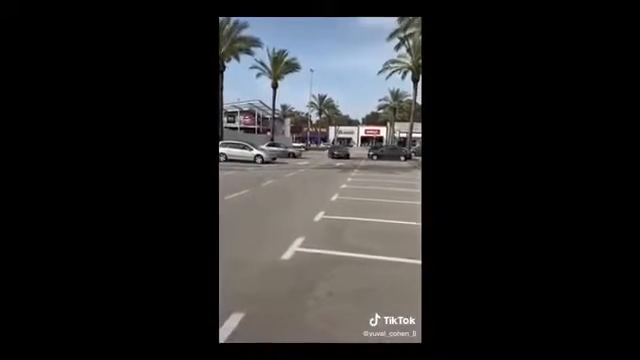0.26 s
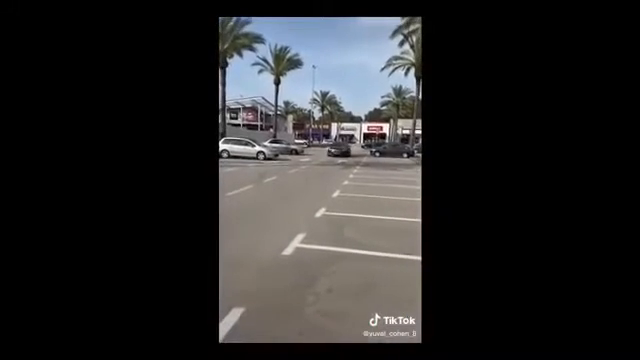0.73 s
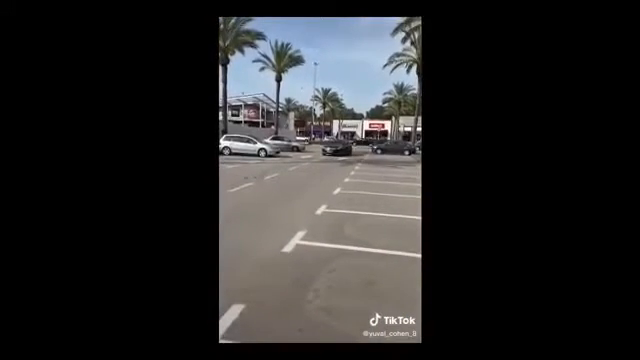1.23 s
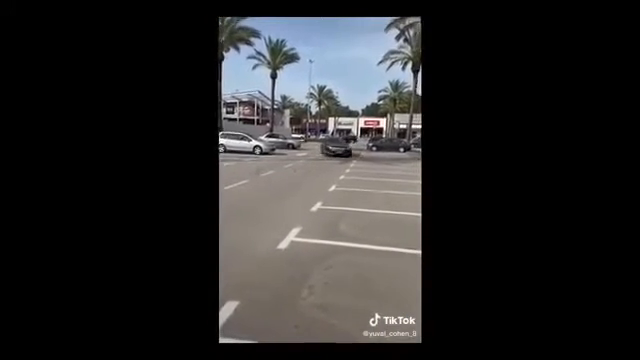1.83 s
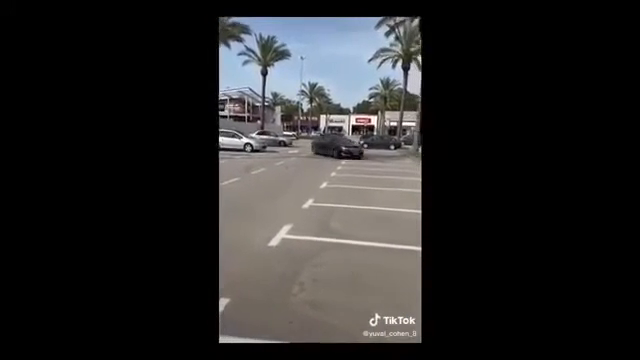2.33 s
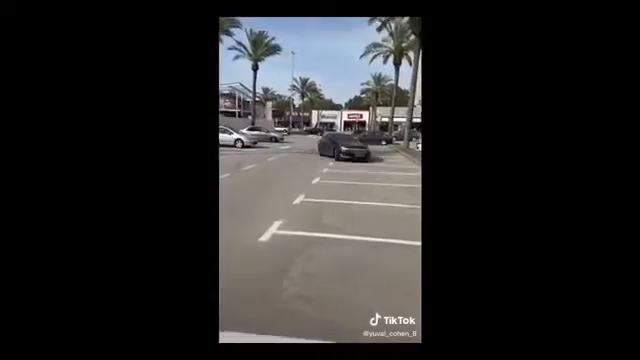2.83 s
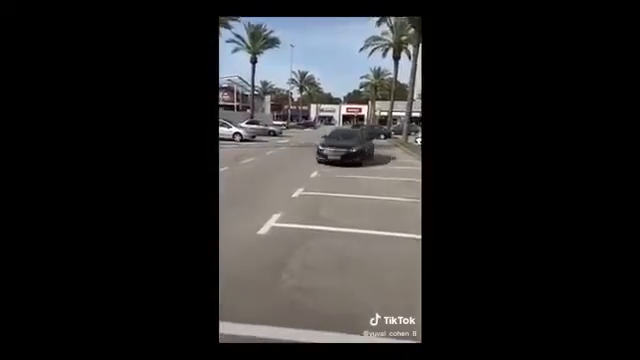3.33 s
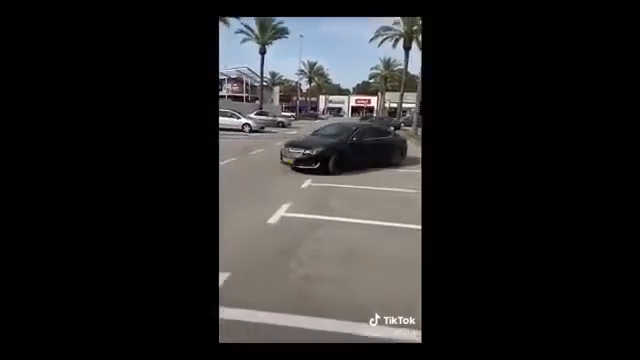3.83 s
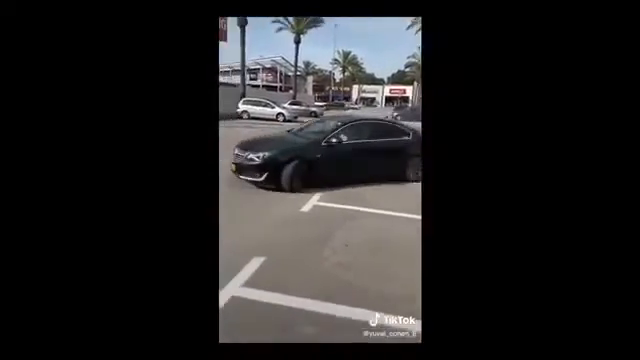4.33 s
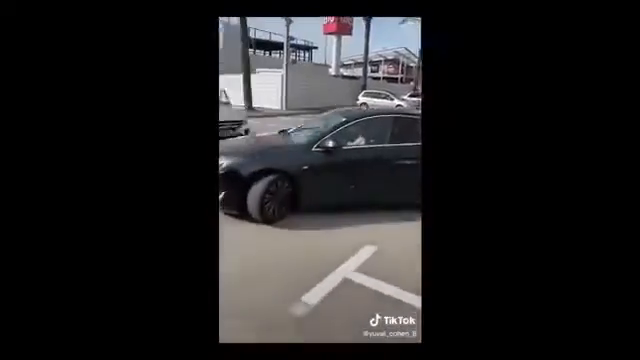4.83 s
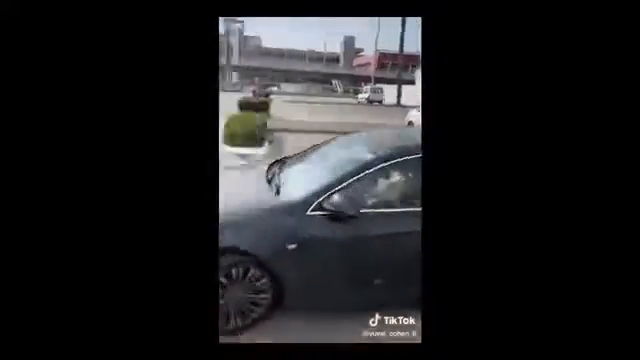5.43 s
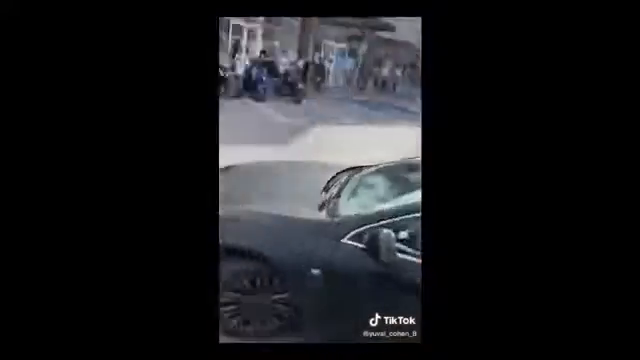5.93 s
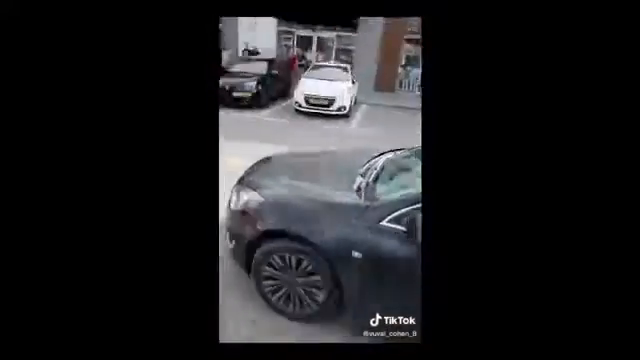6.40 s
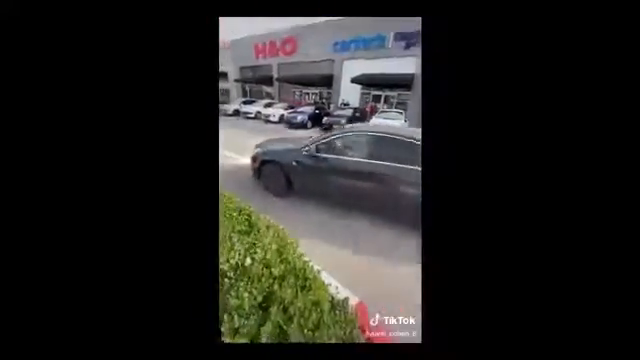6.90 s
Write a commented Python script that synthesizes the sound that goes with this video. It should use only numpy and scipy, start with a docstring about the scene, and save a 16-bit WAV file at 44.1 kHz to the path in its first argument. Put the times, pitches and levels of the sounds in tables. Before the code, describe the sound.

Car tyres give a long, wavering squeal while sliding across asphalt, over gritty hiss, low rumble and wind gusts on the microphone.

```python
"""A car skids past

A car slides sideways across an open asphalt lot, past a hand-held phone. One tyre sticks
and slips so fast that it squeals, while the others howl more loosely around it. Rubber
hisses over grit, the engine drones faintly above a low rumble, and gusts hit the microphones."""
import sys
import numpy as np
from scipy import signal
from scipy.fft import next_fast_len
from scipy.io import wavfile
from scipy.ndimage import uniform_filter1d

SR = 44100
rng = np.random.default_rng(int(sys.argv[2]) if len(sys.argv) > 2 else 0)


def file_out(sig):
    """Save sig as 16-bit WAV at sys.argv[1]."""
    # one column per channel
    cols = np.atleast_2d(sig).T
    # limit, then scale
    lim = np.clip(cols, -1, 1)
    pcm = np.round(lim * 32767).astype(np.int16)
    wavfile.write(sys.argv[1], SR, pcm)


N = 315756

# Where the car is heard; it seems wider when it is near:
# (time [s], left minus right [dB], left's head start [radians], width [0-1])
CAR_POSITION = [(0, -3, -0.68, 0), (.7, -2.5, -0.65, 0.3), (1.15, -4.5, -0.56, 0.25),
                (1.6, -3, -0.87, 0.05), (2.3, -0.5, -0.53, 0.1), (3, -3.5, -0.58, 0.23),
                (3.5, -1.3, -0.48, 0.25), (4.5, -1, -0.38, 0.39), (5, -3.5, -0.75, 0.36),
                (5.6, -2, -0.45, 0.72), (6.2, -1, -1.02, 0.38), (6.8, -6.5, -1.36, 0.98),
                (7.16, -5.5, -1.1, 0.85)]


def amp(db):
    """Turn decibels into a gain."""
    return 10 ** (np.asarray(db) / 20)


def unit_power(x):
    """Scale a signal to an average power of 1."""
    return x / np.sqrt(np.mean(abs(x) ** 2) + 1e-20)


def curves(rows, t):
    """Read a table's columns at times t, gliding from row to row."""
    times, *columns = np.transpose(rows)
    return [np.interp(t, times, column) for column in columns]


def at_pitch(points, hz):
    """Read a (frequency, value) table, gliding on a log-frequency scale."""
    freqs, values = np.transpose(points)
    return np.interp(np.log(hz + 1), np.log(freqs + 1), values)


def wander(width_hz, low_hz):
    """A random complex wobble, mostly slower than width_hz and thinned out below low_hz."""
    step = 16  # samples between drawn points
    hz = abs(np.fft.fftfreq(next_fast_len(N // step + 2), step / SR))
    real, imag = rng.standard_normal((2, len(hz)))
    shape = (hz / (hz + low_hz)) / (1 + (hz / width_hz) ** 2)
    coarse = np.fft.ifft((real + 1j * imag) * shape)
    return unit_power(np.interp(np.arange(N) / step, np.arange(len(hz)), coarse))


def tremble(depth, width_hz, low_hz):
    """A gain that is steady at depth 0 and all wobble at depth 1."""
    return np.sqrt(1 - depth ** 2) + depth * wander(width_hz, low_hz)


def oscillator(hz):
    """A complex tone that follows a changing pitch."""
    return np.exp(2j * np.pi * np.cumsum(hz) / SR)


def stereo(tone, pan_db, lead):
    """Send a complex tone to two microphones, the left pan_db louder and lead radians ahead."""
    half = amp(pan_db / 2) * np.exp(.5j * lead)
    return np.sqrt(2) * np.array([tone * half, tone / half]).real


def shaped_noise(level_db, likeness, size, patchy_db, flicker_db):
    """Patchy, flickering noise that follows level_db(hz, t); likeness(hz) ties left to right."""
    hop = size // 4
    hz = np.fft.rfftfreq(size, 1 / SR)[:, None]
    t = np.arange(N // hop + 5) * hop / SR
    real, imag, other_real, other_imag, patches = rng.standard_normal((len(t), len(hz), 5)).T
    patches = unit_power(uniform_filter1d(uniform_filter1d(patches, 10, axis=0), 8, axis=1))
    same = np.clip(likeness(hz), 0, 1)
    left = real + 1j * imag
    right = same * left + np.sqrt(1 - same ** 2) * (other_real + 1j * other_imag)
    gain = amp(level_db(hz, t) + patchy_db * patches + flicker_db * rng.standard_normal(len(t)))
    _, noise = signal.istft(np.array([left, right]) * gain, nperseg=size, noverlap=size - hop)
    return noise[:, :N] / np.sqrt(size)


def rumble():
    """Rolling tyres, exhaust and far traffic blend into a low wash that swells as the car passes."""
    # Tone colour of the wash: (frequency [Hz], level [dB])
    colour = [(40, -26.5), (120, -25.5), (300, -32), (500, -34), (700, -28.5), (1000, -51.5), (1600, -110)]
    # Its rise and fall: (time [s], gain [dB])
    swell = [(0, 16), (.8, 4), (2.9, 9), (3.6, -3), (4.5, -3.5), (5.3, 2.5), (6.3, 13), (6.7, 5), (7, -2),
             (7.16, -32)]

    def level_db(hz, t):
        return at_pitch(colour, hz) + curves(swell, t)[0]
    return shaped_noise(level_db, lambda hz: .6, size=1024, patchy_db=3.5, flicker_db=1.5)


def wind():
    """Gusts buffet the microphones with low, lumpy noise, a little different in each."""
    # Gusts of air: (start [s], end [s], gain [dB], extra deep bass [dB])
    gusts = [(0, .17, 11, 6.5), (0.195, 0.263, 14.5, 5.5), (0.368, 0.539, 11, 6), (0.972, 1.18, 8.5, -4.5),
             (1.247, 1.42, 6.5, 0.5), (1.483, 1.653, 6.5, -1.5), (1.752, 1.8, 2.5, 6),
             (2.042, 2.337, 7, -2), (2.82, 2.974, 7, -2), (3.14, 3.293, 5.5, 0), (3.321, 3.599, -0.5, 5),
             (3.732, 4.272, 2, -6.5), (4.442, 4.724, -7, 8.5), (4.812, 4.847, -3, 10), (5.003, 5.14, 2, 0),
             (6.379, 6.561, 8.5, -10), (6.65, 6.926, -4.5, 7)]
    # Tone colour of the buffeting: (frequency [Hz], level [dB])
    colour = [(20, -16.5), (45, -25.5), (75, -14), (150, -18.5), (310, -21.5), (460, -23), (560, -39),
              (900, -42), (1500, -110)]
    rise_db_per_s, fall_db_per_s, bass_hz = 520, 420, 100

    def level_db(hz, t):
        power = 0
        for start, end, db, bass_db in gusts:
            fade_db = rise_db_per_s * np.maximum(start - t, 0) + fall_db_per_s * np.maximum(t - end, 0)
            power += amp(db + bass_db / (1 + (hz / bass_hz) ** 4) - fade_db) ** 2
        return at_pitch(colour, hz) + 10 * np.log10(power + 1e-6)
    return shaped_noise(level_db, lambda hz: .88 - .2 * np.minimum(hz / 300, 1),
                        size=512, patchy_db=2.5, flicker_db=2.5)


def puffs(t):
    """Pockets of air hit both microphones: blunt pushes that ring for a cycle or two."""
    # Single hard puffs: (time [s], strength [dB], pitch [Hz])
    hits = [(.203, -14, 294), (0.236, -19, 203), (2.939, -24.5, 170.4), (3.094, -25, 173.6),
            (3.105, -26, 140.5)]
    decay_cycles, out = 1.1, 0
    for start, db, hz in hits:
        cycles = np.maximum(t - start, 0) * hz
        out += 2 * amp(db) * np.sin(2 * np.pi * cycles) * np.exp(-cycles / decay_cycles)
    return out


def engine(t):
    """The cylinders fire in quick turns, making a low, unsteady tone."""
    # The engine's drone: (time [s], firing rate [Hz], level [dB])
    drone = [(0, 161.7, -55), (.6, 159.1, -35), (1, 139.8, -57.5), (1.8, 139.6, -39), (2.5, 119.6, -59),
             (5.7, 109.7, -65), (6.15, 114, -41), (6.4, 108.8, -65), (7.16, 100.4, -58)]
    hz, db = curves(drone, t)
    tone = amp(db) * tremble(.8, width_hz=10, low_hz=.6) * oscillator(hz)
    return stereo(tone, pan_db=.1, lead=-.3)


def echoes(sound):
    """Buildings and parked cars send back scattered echoes that die within half a second."""
    t = np.arange(SR // 2) / SR
    taps = rng.choice([-1., 1.], (2, len(t))) * (rng.random((2, len(t))) < .03)
    taps *= amp(-60 * t / .5) * (t > .012)
    return signal.fftconvolve(sound.mean(0)[None], taps / np.linalg.norm(taps[0]), axes=1)[:, :N]


def scrub():
    """Rubber drags over rough asphalt and makes a wide hiss of changing brightness."""
    # Course of the hiss: (time [s], gain [dB], treble tilt [dB per octave])
    drag = [(0, -3.5, -0.5), (.4, 0, 0.5), (.88, -7.5, 0.5), (1.11, -1.5, 2), (1.6, -13.5, -3),
            (2.03, -3, 0), (2.5, -10, 1), (2.91, -7, -1.5), (3.1, -5, 0.5), (3.55, -3, 1.5),
            (3.67, -11, -2), (3.85, -9, 4), (4.27, -11.5, 6.5), (4.85, -8.5, 5), (5.3, -4.5, 6),
            (5.66, -7, 2.5), (6.45, -2.5, -4), (6.84, -7.5, 1), (7.16, -11.5, 5)]
    # Tone colour of rubber on grit: (frequency [Hz], level [dB])
    colour = [(300, -22.5), (700, -18.5), (1300, -11.5), (2200, -12.5), (2800, -9.5), (3200, -15.5),
              (4300, -19.5), (4850, -29), (5600, -24), (6500, -28.5), (8000, -37), (11000, -42.5),
              (14500, -51)]
    # How alike left and right sound: (frequency [Hz], likeness [0-1])
    likeness = [(300, 0.04), (1100, 0.57), (1450, 1), (2300, 1), (2900, 0.03), (4500, 0), (5500, 0.35),
                (9000, 0.61), (14000, 0.6)]
    dull_hz, dull_octaves, far_db, near_db = 2960, .45, -3.5, -8.5

    def level_db(hz, t):
        db, tilt = curves(drag, t)
        treble_db = tilt * np.clip(np.log2((hz + 50) / 5000), 0, 1.2)
        # one band dulls further when the car body is close
        dull_db = far_db + (near_db - far_db) * curves(CAR_POSITION, t)[2]
        band = np.exp(-.5 * (np.log2((hz + 50) / dull_hz) / dull_octaves) ** 2)
        return at_pitch(colour, hz) + db + treble_db + dull_db * band
    return shaped_noise(level_db, lambda hz: at_pitch(likeness, hz),
                        size=512, patchy_db=2.1, flicker_db=1.2)


def howl(t):
    """The other tyres never settle on one slip rate: breathy, roving whistles with weak octaves."""
    # Two tyres: (time [s], lower pitch [Hz], its level [dB], upper pitch [Hz], its level [dB])
    tyre_pair = [(0, 820, -25, 1049, -26), (.07, 829, -20.5, 1039, -18), (.2, 830, -32, 1020, -32.5),
                 (.55, 811, -34, 1027, -29.5), (.86, 846, -38, 1030, -48), (1.0, 896, -25, 1020, -28),
                 (1.14, 875, -25, 1094, -32), (1.5, 871, -39.5, 1048, -41), (1.95, 852, -39.5, 1039, -36),
                 (2.0, 856, -30.5, 1060, -26), (2.13, 836, -38, 1050, -23),
                 (2.2, 848.3, -21.5, 1041, -34.5), (2.45, 843, -45, 1031, -33.5),
                 (2.7, 846, -36.5, 1015, -41.5), (2.9, 817.5, -33, 1032, -33.5),
                 (3.3, 859.5, -39, 1031, -31.5), (3.53, 889, -28, 1026, -25),
                 (3.77, 859, -34.5, 963.6, -31.5), (4.13, 865, -40, 961.4, -36),
                 (4.4, 876, -26.5, 978, -36), (4.79, 849.5, -35.5, 1000, -31.5),
                 (5.34, 860.7, -34.5, 991, -22), (5.44, 861, -24, 1018, -23), (5.52, 858, -33, 1029, -17.5),
                 (5.62, 856.6, -35, 1038, -29.5), (5.95, 862.4, -23, 972, -29),
                 (6.3, 884.6, -26, 944.3, -27), (6.5, 888.5, -22, 980, -24), (6.66, 868, -23.5, 1028, -21),
                 (6.85, 843.3, -21.5, 1002, -28), (7.16, 864, -53, 965, -23.5)]
    # A faint, lower tyre whose pitch sags: (time [s], pitch [Hz], level [dB])
    moan = [(1.8, 760, -64), (2.0, 735, -43), (2.75, 650, -43), (3.0, 640, -50)]
    lower_hz, lower_db, upper_hz, upper_db = curves(tyre_pair, t)
    pan_db, lead, width = curves(CAR_POSITION, t)
    rasp_db = upper_db - 32 + 24 * np.minimum(width / .39, 1)  # heard only from close by
    voices = [(lower_hz, lower_db, 28, 24), (upper_hz, upper_db, 30, 38),
              (*curves(moan, t), 25, 15), (1.17 * upper_hz, rasp_db, 60, 70)]
    out = 0
    for hz, db, breath_hz, rove_hz in voices:
        wave = oscillator(hz + rove_hz * wander(width_hz=7.83, low_hz=.937).real)
        whistle = wander(breath_hz, low_hz=1) * wave
        # a near car fills a wide angle, so its sound shifts between the microphones
        shift = .92 * width * wander(width_hz=31, low_hz=.55)
        out += stereo(amp(db) * whistle, pan_db + 4 * shift.imag, lead + shift.real)
        out += stereo(amp(db - 23) * whistle ** 2, pan_db=.3, lead=.1)
    return out


def looseness(t, snagging):
    """How unsteady the loudest tyre's grip is: 1 when it falters, 0 when it holds, less at its best."""
    # Spells of faltering grip: (start [s], end [s])
    lapses = [(0, .6), (.76, 1.101), (1.6, 1.8), (2.65, 3.76), (4.8, 4.98), (5.25, 5.55), (5.8, 6.1),
              (6.7, 7.0)]
    fade_s = .1
    faltering = sum(np.clip(np.minimum(t - start, end - t) / fade_s + .5, 0, 1) for start, end in lapses)
    firmest = (t > 4.42) & (t < 4.78)
    return np.minimum(faltering + snagging, 1) - .5 * firmest


def add_chirps(tone, snap, wave):
    """The grip lets go, then bites firmly for a moment; changes tone and snap in place."""
    # Bites of the loudest tyre: (time [s], tone level [dB], octave level [dB], length [s])
    chirps = [(0.346, -19, -36, 0.052), (0.65, -11, -22.5, 0.08), (1.165, -11.5, -28.5, 0.052),
              (1.832, -11.5, -18.5, 0.029), (2.049, -15, -18.5, 0.032), (2.129, -17, -14.5, 0.019),
              (2.346, -12, -20, 0.022), (2.392, -11.5, -23.5, 0.068), (2.786, -21.5, -48, 0.037),
              (3.334, -19.5, -15.5, 0.043), (3.41, -22.5, -14.5, 0.024), (3.444, -19, -18, 0.02),
              (3.508, -30, -16, 0.039), (3.566, -24, -11.5, 0.037), (3.62, -28, -10.5, 0.039),
              (3.827, -30, -20, 0.064), (4.85, -16.5, -25.5, 0.018), (5.192, -20, -52, 0.023),
              (5.325, -14.5, -41, 0.026), (5.368, -11.5, -30, 0.048), (5.449, -10, -31, 0.015),
              (5.611, -13.5, -27.5, 0.066), (5.892, -18.5, -30, 0.016), (6.163, -16.5, -45, 0.038),
              (6.429, -13.5, -27.5, 0.042)]
    for time, tone_db, octave_db, length in chirps:
        gap = slice(round((time - .016) * SR), round((time + .004) * SR))
        dip = signal.windows.tukey(len(tone[gap]), .5)
        tone[gap] *= 1 - .2 * dip
        snap[gap] *= 1 - .55 * dip
        span = slice(round((time - .004) * SR), round((time - .004 + length) * SR))
        bite = signal.windows.tukey(len(tone[span]), .9)
        tone[span] = (1 - bite) * tone[span] + bite * amp(tone_db) * wave[span]
        snap[span] = (1 - bite) * snap[span] + bite * amp(octave_db)


def squeal(t):
    """The loudest tyre's tread sticks and slips in step; as its grip falters, pitch and level shake."""
    # Course of the squeal: (time [s], slip rate [Hz], tone level [dB], octave level [dB])
    course = [(0, 1000, -37, -43), (.15, 983, -21.5, -46), (.3, 974, -22.5, -64), (.45, 977, -27.5, -67),
              (.61, 975, -18.5, -39), (.72, 989.4, -22.5, -48), (.9, 978, -18, -46), (.94, 960, -32.5, -59),
              (1.08, 943.6, -24, -72), (1.14, 1072, -14.5, -39), (1.21, 1027, -21, -26.5),
              (1.34, 1001, -18.5, -29.5), (1.42, 939, -16, -34), (1.52, 935, -24, -28.5),
              (1.6, 925, -23, -35.5), (1.64, 1053, -21.5, -38.5), (1.79, 1030, -31.5, -46),
              (1.82, 975, -14.5, -23), (1.87, 922, -18.5, -21), (1.94, 915, -16, -27.5),
              (2.01, 971, -15.5, -27), (2.07, 906.6, -21.5, -23), (2.2, 903.6, -20, -31),
              (2.47, 882, -18.5, -24.5), (2.6, 897, -24, -39.5), (2.66, 878, -27.5, -59),
              (2.78, 996, -33.5, -74), (3.13, 973, -36, -53), (3.21, 959.7, -34, -29.5),
              (3.46, 972, -33.5, -35), (3.52, 922, -21.5, -21), (3.59, 938, -23.5, -23),
              (3.72, 855, -45, -34), (3.88, 842, -27, -27.5), (3.99, 862, -41, -32),
              (4.06, 836, -36, -31.5), (4.15, 842.4, -22, -31), (4.28, 833, -31.5, -35),
              (4.35, 852, -40, -29.5), (4.43, 838, -33, -30.5), (4.65, 892, -25, -29.5),
              (4.78, 903, -30.5, -39.5), (4.87, 984, -35, -50), (5.0, 913, -20.5, -45),
              (5.4, 929, -21.5, -37), (5.9, 906, -26.5, -38.5), (6.18, 864, -18.5, -35.5),
              (6.3, 839, -23.5, -34), (6.42, 812, -17, -30.5), (6.6, 820.5, -19.5, -35),
              (6.86, 865, -31.5, -34), (7.16, 908, -20, -34)]
    # The grip snags, so the pitch leaps and the level sinks: (time [s], length [s], leap [Hz])
    catches = [(2.02, 0.024, 29.4), (2.216, 0.031, 18.5), (3.994, 0.0295, 81.6), (4.375, .04, 99.8)]
    # The overtone at three times the pitch: (time [s], level against the octave [dB])
    third_levels = [(0, -25), (1.5, -20), (1.85, -19), (2.1, -15), (2.5, -19), (3.25, -16), (4.25, -16.5),
                    (4.7, -22), (5.6, -16), (7.16, -31)]
    hz, tone_db, octave_db = curves(course, t)
    pan_db, lead, width = curves(CAR_POSITION, t)
    snags = [np.clip(2 - 2 * abs(2 * (t - start) / length - 1), 0, 1) for start, length, _ in catches]
    hz += sum(snag * leap_hz for snag, (_, _, leap_hz) in zip(snags, catches))
    snag_gain = 1 - .7 * sum(snags)
    loose = looseness(t, sum(snags))

    roughness = .47 + .39 * loose
    swing = tremble(roughness, width_hz=32, low_hz=4)
    wave = oscillator(hz + 17 * roughness * wander(width_hz=18, low_hz=3).real)
    tone = amp(tone_db) * snag_gain * swing * wave

    # the snap of each slip sets the strength of the overtones, which waver on their own
    snap = amp(octave_db) * snag_gain * np.sqrt(1.9 + .6 * abs(swing) ** 2)
    raggedness = .45 + .47 * loose
    # brief upward slips leave a ragged fringe 100 Hz above the overtones
    slips = abs(wander(width_hz=9, low_hz=2)) * raggedness
    fringe = slips * wander(width_hz=70, low_hz=1) * np.exp(2j * np.pi * 100 * t)
    snap = snap * (tremble(raggedness, width_hz=50, low_hz=4) + .6 * fringe)
    snap *= tremble(.55 * width, width_hz=90, low_hz=3)  # smeared when the car is near
    add_chirps(tone, snap, wave)

    octave = snap * wave ** 2
    blur = .9 + .55 * wander(width_hz=80, low_hz=1.1)
    third = amp(curves(third_levels, t)[0]) * snap * wave ** 3 * blur
    return stereo(tone, pan_db, lead) + stereo(octave, .5, .05) + stereo(third, -.4, .87)


def scene():
    """Mix the tyres and their echoes with the scrub, engine, rumble and wind."""
    t = np.arange(N) / SR
    tyres = squeal(t) + howl(t)
    return tyres + amp(-22.5) * echoes(tyres) + scrub() + engine(t) + rumble() + wind() + puffs(t)


def record(dry):
    """The small microphones lose the deepest bass, and the phone cuts the highest treble."""
    lowest_hz, highest_hz = 52, 14800
    bass_cut = signal.butter(3, lowest_hz, "high", fs=SR, output="sos")
    treble_cut = signal.firwin(1023, highest_hz, window=("kaiser", 9), fs=SR)
    return signal.oaconvolve(signal.sosfilt(bass_cut, dry), treble_cut[None], "same")


dry = scene()
out = record(dry)
file_out(out)
```